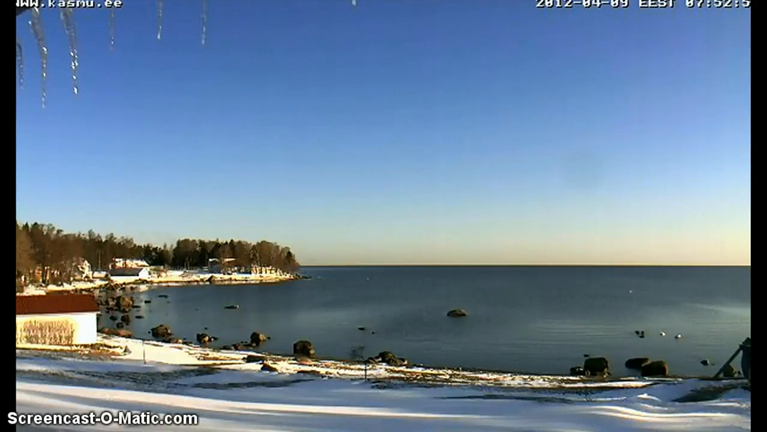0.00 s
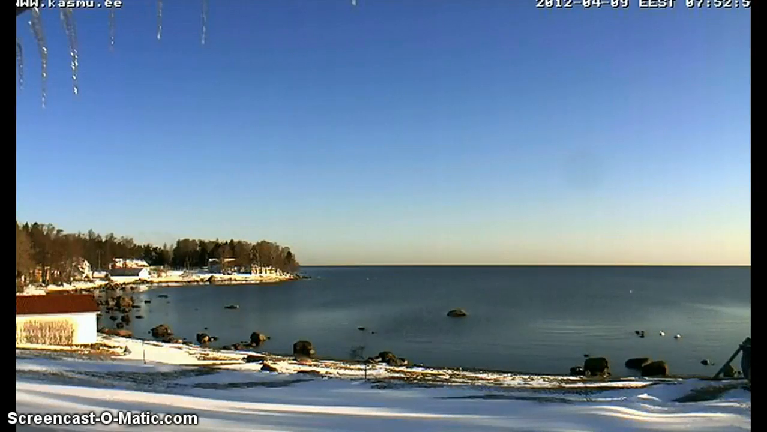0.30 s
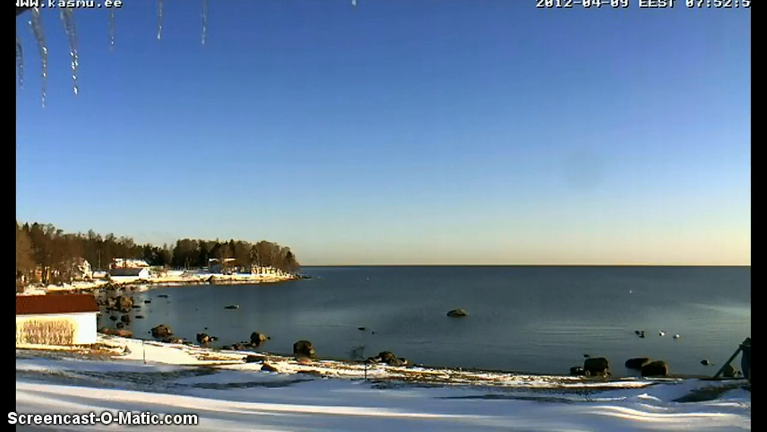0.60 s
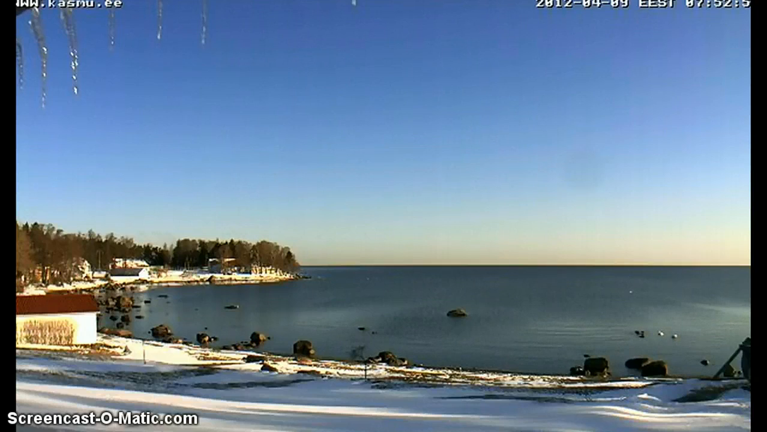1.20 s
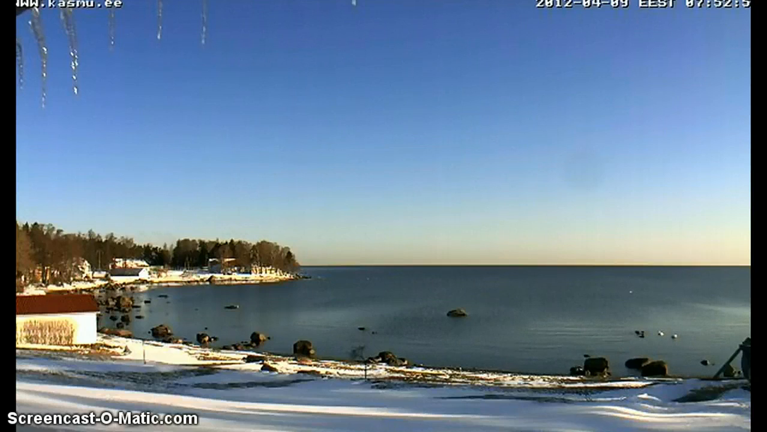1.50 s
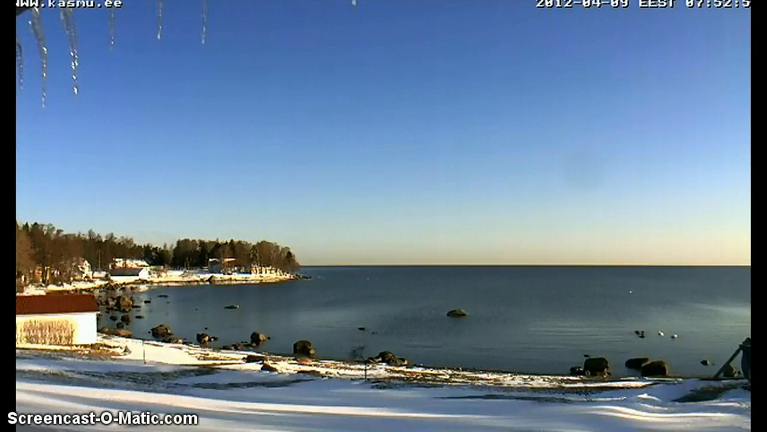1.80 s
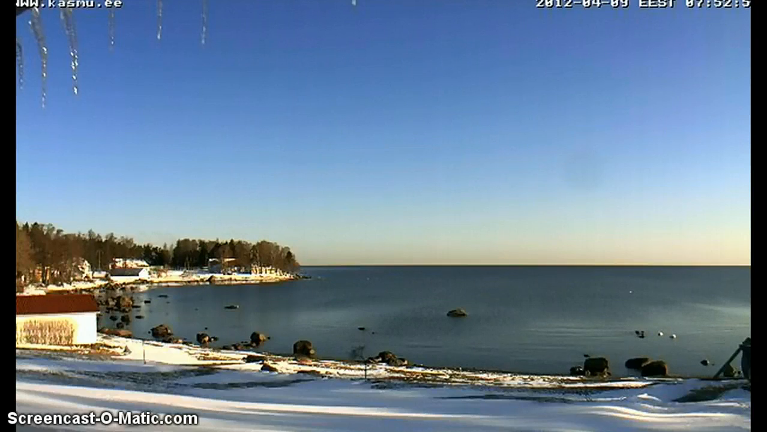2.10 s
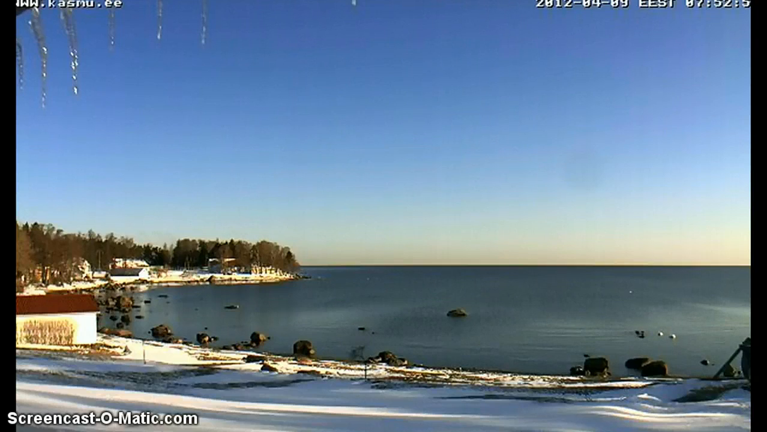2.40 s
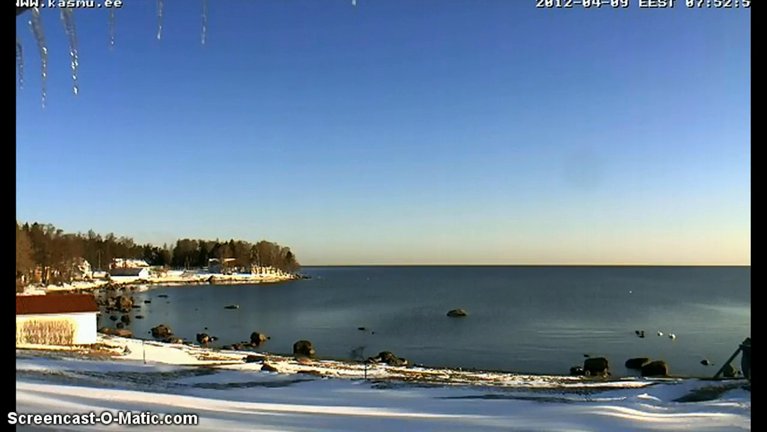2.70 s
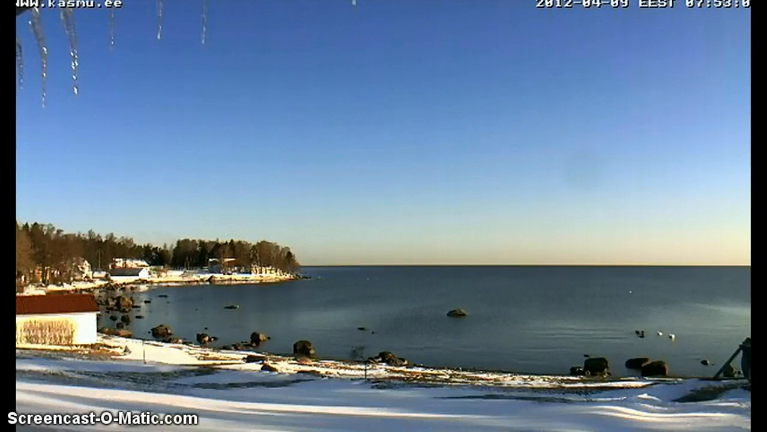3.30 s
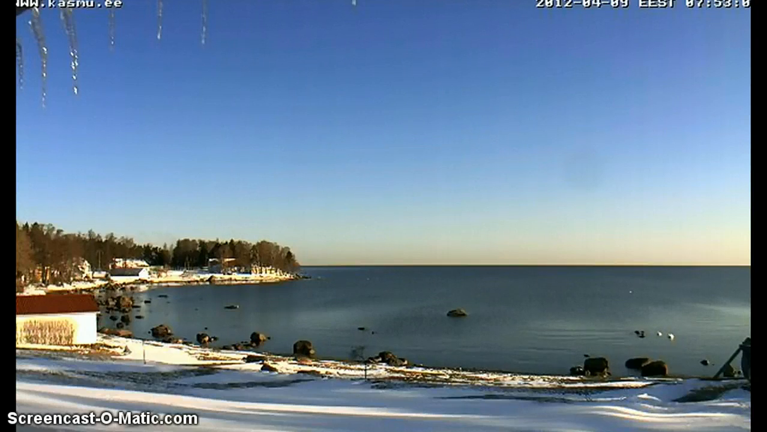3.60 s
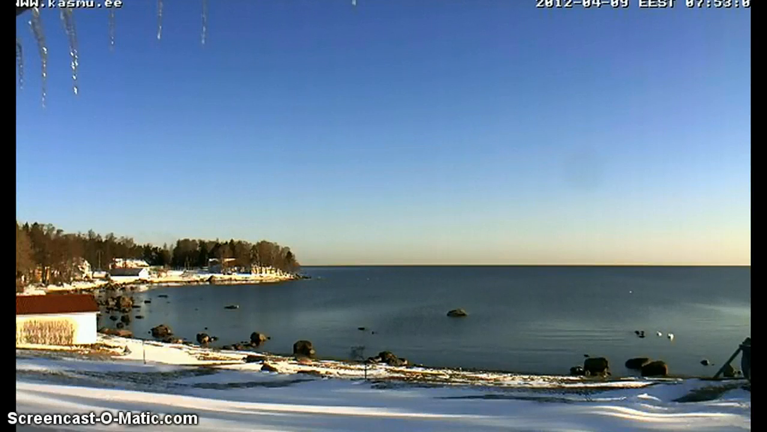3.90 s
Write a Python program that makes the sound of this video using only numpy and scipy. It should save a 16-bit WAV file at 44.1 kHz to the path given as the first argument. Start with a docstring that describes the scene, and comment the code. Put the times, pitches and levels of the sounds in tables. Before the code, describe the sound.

A swan honks repeatedly across a bay over steady background noise and a low electrical throb.

```python
"""A swan's two drawn-out calls carry across a calm bay, then a run of two-part honks and two falling ones,
each a nearly pure tone that swells, steps down and breaks, echoing off the shore. Hoarse upper tones
glide around the honks, and water ticks close by. The outdoor camera's narrow-band microphone adds a noise
floor, a low electrical throb at its frame rate and a thin hiss; once the level drops out briefly."""
import sys
import numpy as np
from scipy import signal
from scipy.fft import rfft, irfft
from scipy.io import wavfile

SR = 44100
rng = np.random.default_rng(int(sys.argv[2]) if len(sys.argv) > 2 else 0)


def store_wav(level_fs):
    """Save 16-bit WAV to argv[1]."""
    pcm = np.round(np.clip(np.atleast_2d(level_fs), -1, 1) * 32767)
    wavfile.write(sys.argv[1], SR, pcm.T.astype(np.int16))


N = 176400
T = np.arange(N) / SR

WOBBLE, JITTER, FLUTTER_DB = .004, .011, 2.6   # slow and fast shares of pitch; level flutter
RASP_DB, OCTAVE_RASP, BREAK_RASP = -16, .75, 1.9   # hoarseness scales these, the jitter and the flutter
RISE_HZ_PER_S, ARCH_S, STEP_S, BREAK_BEFORE_S, DROP_KNEE_S = 800, .065, .0301, .01365, .0217
MIDDLE_SWELL_S, TRAIL_S, TRAIL_DB = .01, .015, -10   # the voice trails on behind its last accent
RELEASE_S, STOP_S = .028, .014   # it holds past the last accent, then stops sharply
OCTAVE_HELD, OCTAVE_LAG_S = .58, .0053   # the octave's share between accents; it opens a little late
# Swan honks out on the bay: (first accent [s], middle accent [s], last accent [s], lead-in [s],
# first swell [s], last swell [s], top pitch [Hz], step down [Hz], break pitch [Hz], drop [Hz/s],
# first level [dB], held level [dB], middle level [dB], last level [dB], early octave [dB],
# late octave [dB], half-tones [dB], hoarseness [0-1])
HONKS = [(.116, .146, .162, .17, .022, .013, 1280, 75, 1192, 900, -36, -39.5, -40, -33, -66, -48, -70, .25),
         (.422, .452, .481, .08, .032, .015, 1280, 50, 1214, 1500, -39.5, -44, -38, -28.5, -70, -43, -70, .25),
         (.652, .688, .721, .047, .018, .009, 1135, 50, 1055, 3200, -40, -50, -43, -35.5, -49, -42, -62, .5),
         (.897, .931, .961, .055, .023, .008, 1158, 60, 1055, 3500, -31, -49, -41, -34, -45, -41, -56, .45),
         (1.138, 1.168, 1.203, .04, .023, .008, 1160, 60, 1058, 3700, -30.5, -54, -46, -33.5, -44, -43, -56, .45),
         (1.382, 1.41, 1.491, .04, .023, .009, 1164, 60, 1060, 3700, -32, -54, -42, -34.5, -44, -43.5, -58, .45),
         (1.671, 1.697, 1.737, .04, .021, .008, 1164, 60, 1058, 3900, -31.5, -54, -42, -34.5, -42.5, -41, -58, .45),
         (1.917, 1.948, 1.991, .03, .021, .008, 1178, 60, 1060, 3700, -32, -54, -43, -34, -42.5, -43, -53, .45),
         (2.174, 2.203, 2.247, .033, .02, .011, 1173, 65, 1058, 3300, -32, -51, -40, -36.5, -44, -40, -56, .45),
         (2.433, 2.47, 2.518, .018, .015, .013, 1192, 85, 1050, 3200, -30.5, -48, -37.5, -37, -47, -43, -49, .7),
         (2.729, 2.76, 2.82, .04, .008, .036, 1190, 115, 1022, 2200, -30.5, -44, -41, -42, -49, -49, -48, .9),
         (3.104, 3.164, 3.227, .018, .012, .038, 1180, 120, 955, 1100, -31, -42.5, -42, -35.5, -50, -54, -56, .8)]


def swan():
    """A nearly pure voice that swells three times as it falls; returns it and its overtones apart."""
    voice, overtones = np.zeros(N), np.zeros(N)
    wobble, jitter, flutter = WOBBLE * drift(32.5), JITTER * drift(300), FLUTTER_DB * drift(108)
    rasp, smear, crack = from_db(RASP_DB) * drift(420), OCTAVE_RASP * drift(125), BREAK_RASP * drift(160)
    for (first, middle, last, lead, first_swell, last_swell, high, step, low, drop,
         first_db, held_db, middle_db, last_db, early_db, late_db, half_db, hoarse) in HONKS:
        # The pitch arches up, steps down, slides, then breaks ever more steeply.
        breaks = last - BREAK_BEFORE_S
        below_top = RISE_HZ_PER_S * ARCH_S * ramp((first - T) / ARCH_S / 1.495)
        stepped = ramp((T - first) / STEP_S)
        fall = np.clip((T - first) / (breaks - first), 0, 1)
        plunge = drop * np.clip(T - breaks, 0, .042) ** 2 / DROP_KNEE_S
        hz = high - below_top - step * stepped + (low - high + step) * fall - plunge
        phase = turn(hz * (1 + wobble + hoarse * jitter))

        sounding = ramp((last + RELEASE_S - T) / STOP_S)
        held = ramp((T - first + lead) / .012) * sounding
        trail = from_db(TRAIL_DB) * accent(last + TRAIL_S, MIDDLE_SWELL_S)
        ending = sounding * (accent(last, last_swell) + trail)
        level = (from_db(held_db) * held + from_db(first_db) * accent(first, first_swell)
                 + from_db(middle_db) * accent(middle, MIDDLE_SWELL_S) + from_db(last_db) * ending)
        shake = from_db(hoarse * flutter)
        voice += level * shake * (np.sin(phase) + hoarse * rasp * np.cos(phase))

        early = accent(first + OCTAVE_LAG_S, first_swell) + OCTAVE_HELD * held * (1 - fall)
        late = ending + OCTAVE_HELD * held * fall ** 2 * (T < last)
        octave_level = from_db(early_db) * early + from_db(late_db) * late
        octave = np.sin(2 * phase + hoarse * (smear + crack * ending))   # cracks on the break
        half_tones = np.sin(5 * phase / 2 + 2 * smear) + np.sin(3 * phase / 2 + 2 * smear) / 2
        overtones += shake * (octave_level * octave + from_db(half_db) * held * stepped * half_tones)
    return np.sqrt(2) * voice, overtones


# Hoarse, gliding upper tones around the honks: the swan's rough overtones and faint distant calls.
# (start [s], length [s], start pitch [Hz], end pitch [Hz], level [dB], bandwidth [Hz])
HOARSE_TONES = [(0.333, 0.05, 1850, 1800, -47, 200), (0.825, 0.06, 1400, 1810, -46, 110),
                (0.719, 0.087, 2180, 2060, -47.5, 110), (2.348, 0.16, 1700, 1650, -41, 300),
                (2.35, 0.19, 2420, 2150, -43, 300), (3.091, .1, 2807, 2620, -48.5, 220),
                (3.155, 0.092, 1850, 1810, -41.5, 69.6), (3.225, 0.125, 1660, 1580, -45, 111),
                (3.76, 0.19, 1900, 1760, -49, 190), (3.782, 0.188, 2520, 2417, -55, 260)]


def hoarse_tones():
    """Each tone is rough breath in one gliding throat resonance."""
    tones = np.zeros(N)
    for start, length, start_hz, end_hz, db, width in HOARSE_TONES:
        progress = np.clip((T - start) / length, 0, 1)
        phase = turn(start_hz + (end_hz - start_hz) * progress)
        breath = drift(width / 2) * np.sin(phase) + drift(width / 2) * np.cos(phase)
        tones += from_db(db) * np.sin(np.pi * progress) * breath
    return tones


# Reflections off the shore, as they reach the microphone: (delay [s], level [dB])
SHORE_ECHOES = [(0.035, -22), (0.077, -27), (.135, -25.5)]


def shore(calls, tail_db=-16.5, tail_t60_s=.58):
    """The calls return as a few distinct echoes and a diffuse tail from the trees."""
    tail = rng.standard_normal(N) * from_db(-60 * T / tail_t60_s) * ramp(T / .016)
    diffuse = signal.fftconvolve(calls, tail / np.sqrt(np.sum(tail ** 2)))[:N]
    echoes = sum(from_db(db) * np.interp(T - delay, T, calls, left=0) for delay, db in SHORE_ECHOES)
    return from_db(tail_db) * diffuse + echoes


# Water close to the microphone: (time [s], level [dB])
DRIPS = [(3.369, -33.5), (3.836, -35), (3.926, -34)]


def drips(pitch_hz=2060, width_hz=370, decay_s=.0053):
    """Each drip is a tick of narrow-band noise that dies at once."""
    level = sum(from_db(db) * (T >= at) * np.exp(-abs(T - at) / decay_s) for at, db in DRIPS)
    return level * drift(width_hz / 2) * np.sin(2 * np.pi * pitch_hz * T)


# Colour of the noise floor at the microphone: (frequency [Hz], relative density [dB])
FLOOR_SPECTRUM = [(15, -14), (38, -17), (62, 7.5), (90, 1.5), (140, 2.5), (200, -2), (330, -5), (550, -8.5),
                  (1000, -7.5), (1500, -10), (2200, -11.5), (2800, -15), (3500, -15.5)]
# Swell of its upper part: (time [s], relative level [dB])
FLOOR_SWELL = [(0, 2.5), (1.2, 2.5), (2.4, 2.5), (2.95, 0.5), (3.3, 3.5), (3.62, -2), (4, 1)]


def noise_floor(level_db=-38.5, upper_from_hz=800):
    """Dull outdoor noise whose upper part rises and falls a little."""
    times, db = np.transpose(FLOOR_SWELL)
    swell = from_db(np.interp(T, times, db - db.mean()))
    bed = noise(FLOOR_SPECTRUM)
    upper = cut(bed, upper_from_hz, "high", order=1)
    return from_db(level_db) * (bed + upper * (swell - 1))


FRAME_HZ, MAINS_HZ, MAINS_DB = 25, 50, -55
PULSE_AT_S, PULSE_S, PULSE_DB, PULSE_SPREAD_DB = .00079, .00586, -29.5, 1.5
SAG_S, SAG_DB, SAG_SPREAD, SAG_NOISE_DB, SAG_TOP_HZ = .01038, -41, .65, -38.5, 196
# Rise and fall of the throb inside the camera: (time [s], gain [dB])
THROB_GAIN = [(0, .5), (2.44, 1), (2.52, -5), (2.78, 1.5), (3.42, .5), (3.55, -4.5), (3.74, 2.5), (4, -2.5)]


def throb(low_hz=22.2, top_hz=425):
    """Electrical interference: an unsteady sag leads a rounded pulse each frame, over faint mains hum."""
    since = (T - PULSE_AT_S) % (1 / FRAME_HZ)
    pulse = np.sin(np.pi * np.clip(since / PULSE_S, 0, 1)) * from_db(PULSE_DB + PULSE_SPREAD_DB * drift(30))
    depth = from_db(SAG_DB) * (1 + SAG_SPREAD * drift(30))
    sag = (since > 1 / FRAME_HZ - SAG_S) * (from_db(SAG_NOISE_DB) * drift(SAG_TOP_HZ) - depth)
    gain = from_db(np.interp(T, *np.transpose(THROB_GAIN)))
    mains = from_db(MAINS_DB) * np.cos(2 * np.pi * MAINS_HZ * T)
    return cut(cut(gain * (pulse + sag), top_hz), low_hz, "high", order=1) + mains


# Hiss behind the microphone: (frequency [Hz], relative density [dB])
HISS_SPECTRUM = [(2500, -37), (3800, 0), (7500, 0), (10000, -2), (12000, -3.5)]
# Whines in the same circuits: (frequency [Hz], level [dB])
WHINES = [(8659, -77.5), (11463, -86), (11545, -75)]


def electronics(hiss_db=-59):
    """The camera's circuits add a thin hiss and faint, steady high tones."""
    whine = sum(np.sqrt(2) * from_db(db) * np.sin(2 * np.pi * hz * T) for hz, db in WHINES)
    return from_db(hiss_db) * noise(HISS_SPECTRUM) + whine


def dropout(at_s=1.413, length_s=.014, recover_s=.033):
    """Depth of one brief dip in level, 0 to 1: quick to fall, slower to recover."""
    return ramp((T - at_s) / .0047 + .5) * ramp((at_s + length_s + recover_s - T) / recover_s)


def accent(at, swell, fade_share=.61):
    """A rounded swell that fades faster than it rises."""
    return np.exp(-((T - at) / np.where(T < at, swell, fade_share * swell)) ** 2)


def from_db(db):
    """Decibels to gain."""
    return 10 ** (np.asarray(db) / 20)


def rms_one(x):
    """Scale to unit power."""
    return x / np.sqrt(np.mean(x ** 2) + 1e-20)


def cut(x, hz, kind="low", order=2):
    """Butterworth filter."""
    return signal.sosfilt(signal.butter(order, hz, kind, fs=SR, output="sos"), x)


def drift(hz):
    """Random wander below hz, unit power."""
    return rms_one(cut(rng.standard_normal(N + SR), hz)[SR:])


def noise(spectrum):
    """Noise of a given colour, unit power."""
    hz, db = np.transpose(spectrum)
    bins_hz = np.maximum(np.arange(N // 2 + 1) * SR / N, 1)
    colour = from_db(np.interp(np.log(bins_hz), np.log(hz), db))
    return rms_one(irfft(rfft(rng.standard_normal(N)) * colour, N))


def ramp(x):
    """Smooth step from 0 to 1."""
    return np.sin(np.pi / 2 * np.clip(x, 0, 1)) ** 2


def turn(hz):
    """Running phase of a pitch."""
    return 2 * np.pi * np.cumsum(hz) / SR


OVERTONE_ECHO_DB = 8.5   # the overtones carry farther and return more strongly
OUTDOOR_DIP_DB, THROB_DIP_DB = -14.5, -7
MIC_TOP_HZ, CUTOFF_HZ = 3543, 12000


def scene():
    """The bay through the narrow-band microphone, then the hiss and whine of the electronics."""
    voice, overtones = swan()
    calls = voice + hoarse_tones()
    echoes = shore(calls + from_db(OVERTONE_ECHO_DB) * overtones)
    outdoors = calls + overtones + echoes + drips() + noise_floor()
    dip = dropout()
    heard = outdoors * from_db(OUTDOOR_DIP_DB * dip) + throb() * from_db(THROB_DIP_DB * dip)
    narrowed = signal.sosfiltfilt(signal.butter(18, MIC_TOP_HZ, fs=SR, output="sos"), heard)
    return (narrowed + electronics())[None]


def record(dry):
    """The camera cuts the top of the hiss steeply."""
    return signal.sosfilt(signal.ellip(12, .2, 70, CUTOFF_HZ, fs=SR, output="sos"), dry)


dry = scene()
out = record(dry)
store_wav(out)
```